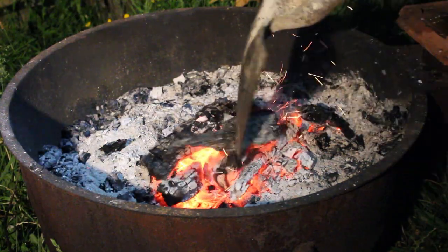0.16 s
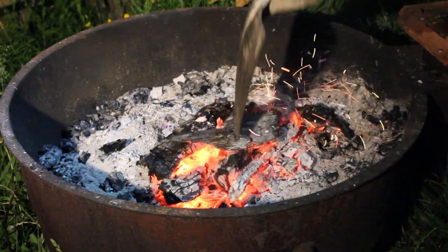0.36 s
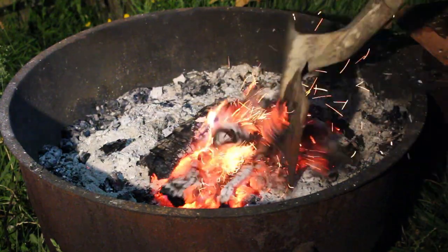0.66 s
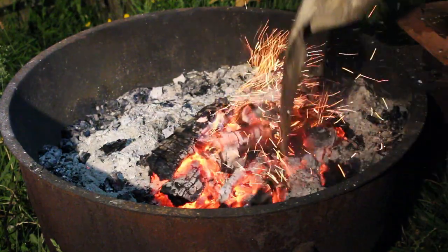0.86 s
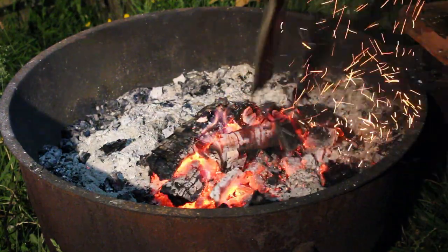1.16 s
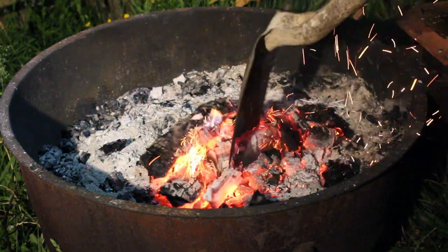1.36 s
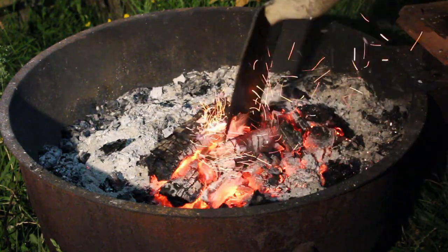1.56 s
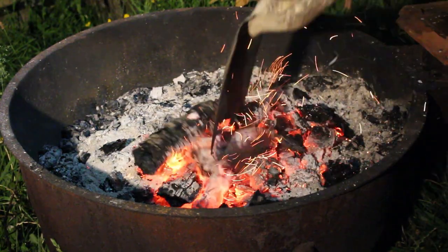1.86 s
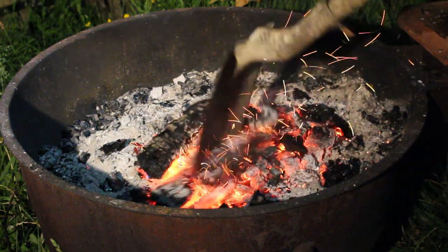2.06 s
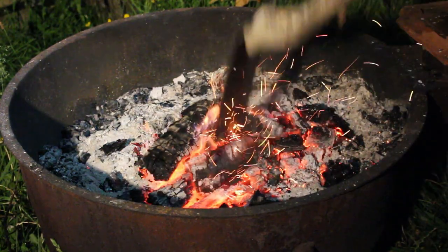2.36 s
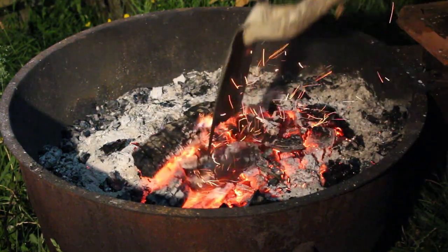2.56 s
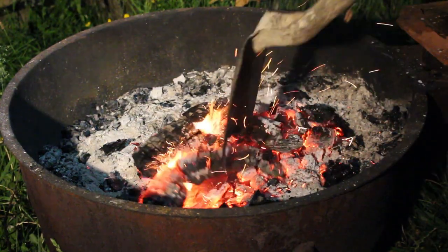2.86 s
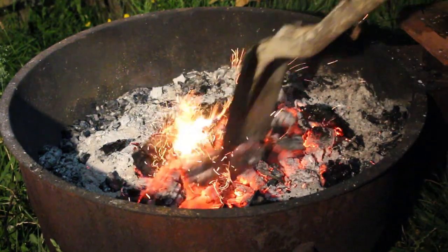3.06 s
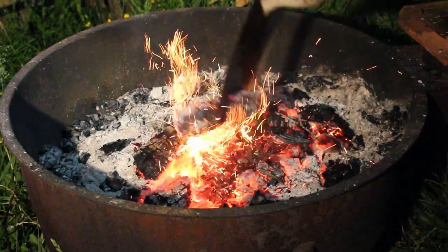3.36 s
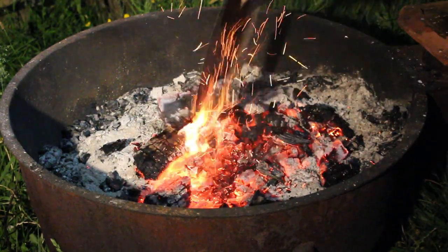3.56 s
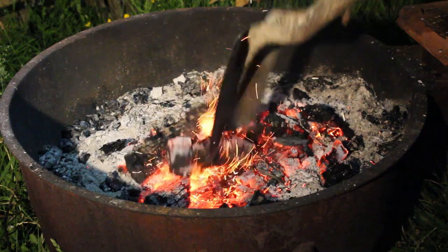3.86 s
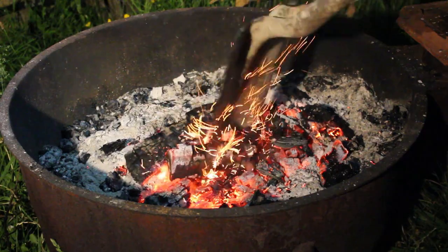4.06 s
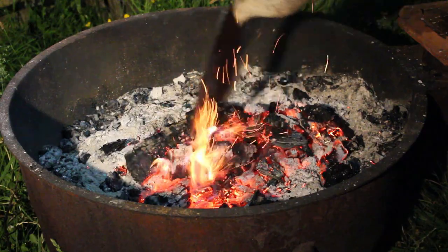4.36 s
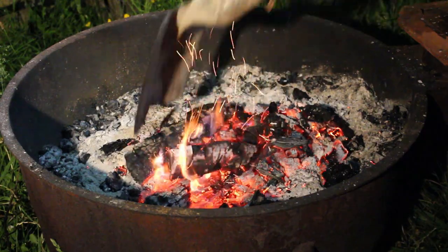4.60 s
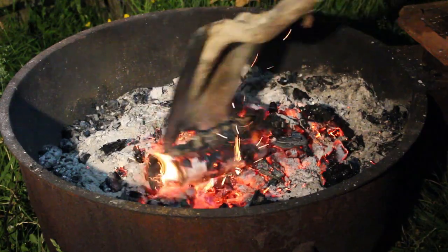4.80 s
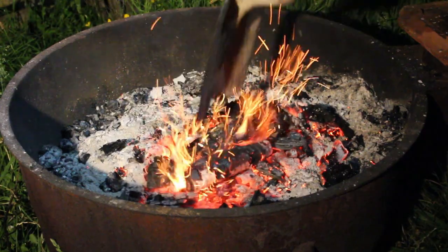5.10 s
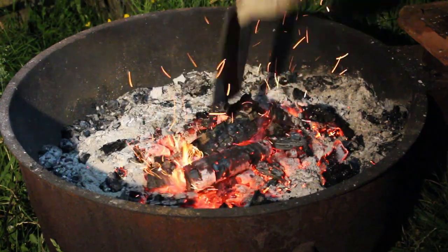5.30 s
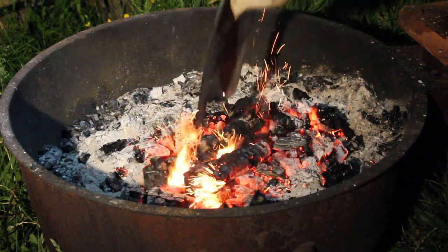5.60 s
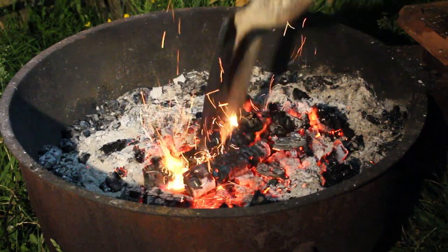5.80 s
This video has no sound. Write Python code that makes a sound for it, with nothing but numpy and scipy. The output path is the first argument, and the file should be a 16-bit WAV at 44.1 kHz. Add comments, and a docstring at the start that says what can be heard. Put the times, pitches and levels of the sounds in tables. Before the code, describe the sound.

Close up outdoors, a flat steel poker is thrust into glowing charcoal in a steel bowl. Sharp crunches land at about 0.1 and 0.6 seconds, the second followed by a fuller clatter of loosened embers. A busier run comes at 1.3, 1.7, 2.0, 2.4, 2.75 and 3.0, with hollow knocks and several low, soft thumps as the ash bed yields. Then it is mostly quiet, with tiny drops and trickles, until a bright hit at 3.8. A longer, grinding crunch with several snaps follows at 4.7, a small slide of embers near 4.9, and final sharp jabs at 5.4 and 5.7. Each stroke is very short: dense brittle cracking, a damped steel clink around the upper midrange, and a faint bowl ring. Glassy chips trickle afterwards. Underneath lies a faint hiss with a weak, fading sizzle; all action is centred, the microphone hiss slightly wide.

```python
"""A flat steel poker is driven twelve times into glowing charcoal in a steel fire bowl, outdoors, close by.
Each thrust is a dense run of brittle fractures that ring the blade, with a hollow knock and a bowl ring.
Most thrusts also thump the ash bed in slow sagging swings. Lumps snap in short bursts of fractures,
loose embers trickle back with glassy clinks or drop dully into the ash, and the fire hisses faintly as
filtered noise. The microphone stands straight ahead of the bowl and adds its own hiss left and right."""
import sys
import numpy as np
from scipy import signal
from scipy.fft import rfft, irfft
from scipy.io import wavfile

SR = 44100
rng = np.random.default_rng(int(sys.argv[2]) if len(sys.argv) > 2 else 0)


def pcm_store(signal):
    """Save signal as 16-bit PCM."""
    levels = np.round(np.clip(np.atleast_2d(signal), -1, 1) * 32767)
    wavfile.write(sys.argv[1], SR, levels.astype(np.int16).T)


N = 261954
TIME = np.arange(N) / SR
TOP_HZ = 15900  # upper edge of what the recorder keeps

# Thrusts of the poker. Each row: start in seconds, push length in seconds, level at entry in dB,
# level at the end of the push in dB, release time constant in seconds, blade ring in relative dB,
# centre of the blade ring in Hz, grit above 5 kHz in relative dB, hollow knock in relative dB, its pitch in Hz,
# bowl ring in dB, centre of the bowl ring in Hz, trickle of loosened embers in dB,
# their dull tumbling in dB, settling time constant in seconds.
THRUSTS = [ (.129, .013, -17, -16, 0.013, 0.5, 3240, -3, -6.5, 380, -53, 1430, -36, -52, 0.13),
           (.603, 0.017, -16.5, -17, 0.023, -4.5, 2560, -1.5, -13, 220, -39.5, 770, -24.5, -33.5, 0.089),
           (1.302, 0.052, -25.5, -23.5, 0.015, -1.5, 2650, -2, -3, 450, -43.5, 1430, -34.5, -46, 0.073),
           (1.719, .011, -24.5, -15.5, 0.014, 0, 3010, 0, 2, 348, -56.5, 1430, -32, -44.5, .09),
           (2.022, .051, -20, -21.5, 0.011, 1.5, 2750, -3, -3, 333, -43.5, 1360, -29, -33.5, 0.069),
           (2.433, 0.031, -21, -19.5, 0.013, -2, 2780, -4.5, -7.5, 310, -54, 1360, -36, -41.5, 0.12),
           (2.753, 0.016, -17.5, -16.5, 0.0091, -2, 2700, -4, 0.5, 363, -48, 1290, -34.5, -47, 0.091),
           (2.998, 0.022, -23, -16.5, 0.012, -19, 2720, -4.5, -5.5, 280, -52.5, 1290, -30.5, -36.5, 0.11),
           (3.822, 0.037, -22.5, -19, .011, 3, 2720, -6, -12, 401, -48, 1290, -40.5, -47.5, 0.09),
           (4.702, 0.059, -22, -25.5, 0.012, -1, 2920, -1.5, -17, 450, -45, 1430, -27.5, -38, 0.12),
           (5.392, 0.03, -18, -19, 0.0088, -2, 3100, 0.5, -8.5, 396, -53.5, 1290, -36.5, -51, 0.081),
           (5.723, 0.026, -25, -14.5, 0.0095, -7.5, 3600, -5, -12, 420, -50.5, 1290, -37, -45, 0.078)]
# Spectrum of breaking charcoal. Each row: frequency in Hz, relative level in dB.
CHARCOAL = [(100, 4), (400, -3.5), (750, 0.5), (1300, 1), (2000, 3.5), (3000, 5.5), (4500, -1), (8000, 1.5),
            (12500, -2.5), (16000, -10.5)]
# Spectrum of lumps tumbling in the ash. Each row: frequency in Hz, relative level in dB.
ASH = [(25, -34.5), (60, 4.5), (110, 2.5), (190, -1), (260, -5), (390, -2.5), (520, -8), (700, -13),
       (1500, -24.5), (6000, -39.5)]


def undb(db):
    """Decibels to gain."""
    return 10 ** (np.asarray(db) / 20)


def unit(x):
    """Scale to rms 1."""
    return x / (np.std(x) + 1e-12)


def add(track, s, x):
    """Mix x into the track from time s in seconds."""
    i = max(int(s * SR), 0)
    track[i:i + len(x)] += x[:len(track) - i]


def colour(x, points):
    """Causal minimum-phase filter through (Hz, dB) points, built from the folded cepstrum; rms 1."""
    size = 4096
    hz, db = np.transpose(points)
    bins_hz = np.arange(size // 2 + 1) * SR / size
    log_gain = np.log(undb(np.interp(np.log(bins_hz + 1), np.log(hz), db)))
    cepstrum = irfft(log_gain)[:size // 2]
    cepstrum[1:] *= 2
    response = irfft(np.exp(rfft(cepstrum, size)))
    return unit(signal.fftconvolve(x, response)[:len(x)])


def band(x, hz, q):
    """One broad resonance; rms 1."""
    b, a = signal.iirpeak(min(hz, SR / 3), max(q, 1), fs=SR)
    return unit(signal.lfilter(b, a, x))


def ring(modes, t):
    """Response of (Hz, dB, t60) modes to one tap: decaying sines of alternating sign."""
    total = 0
    for k, (hz, db, t60) in enumerate(modes):
        total = total + (-1) ** k * undb(db - 60 * t / t60) * np.sin(2 * np.pi * hz * t)
    return total


def focused(modes, centre_hz, focus_db, focus_width):
    """The point of contact favours the modes near one pitch; the width is in natural-log frequency."""
    favoured = []
    for hz, db, t60 in modes:
        closeness = np.exp(-(np.log(hz / centre_hz) / focus_width) ** 2)
        favoured.append((hz, db + focus_db * closeness, t60))
    return favoured


def fractures(n, per_s, spread_db):
    """Brittle cracking as random tiny clicks of uneven size and either sign; rms 1."""
    happens = rng.random(n) < per_s / SR
    size = undb(spread_db * np.clip(rng.standard_normal(n), -2, 2))
    return unit(happens * size * rng.choice([-1, 1], n))


def clinks(n, per_s, low_hz, high_hz, cycles, spread_db):
    """Small glassy chips, each with four unrelated partials that decay over so many cycles; rms 1."""
    out, t = np.zeros(n + 1024), TIME[:1024]
    for when, size, damping, *pitches in rng.random((int(per_s * n / SR) + 1, 7)):
        hz = np.minimum(low_hz + (high_hz - low_hz) * np.array(pitches)[:, None], TOP_HZ)
        decay = np.exp(-t * hz / (cycles * (.5 + damping)))
        partials = np.sin(2 * np.pi * hz * t) * decay
        add(out, when * n / SR, undb(spread_db * size) * partials.sum(axis=0))
    return unit(out[:n])


def bowl_echoes(x, share_db=-2, decay_s=0.0041):
    """Sound bounces between the bowl's close walls, in a new random pattern at every call; rms 1."""
    t = TIME[:SR // 60]
    taps = rng.standard_normal(len(t)) * np.exp(-t / decay_s)
    taps *= undb(share_db) / np.linalg.norm(taps)
    taps[0] = 1  # direct sound
    return unit(signal.fftconvolve(x, taps)[:len(x)])


def thrusts():
    """Charcoal crumbles while the blade pushes in; the hollow knock builds with depth and the bowl rings on."""
    # Modes of the steel bowl. Each row: frequency in Hz, relative level in dB, t60 in seconds.
    bowl_modes = [(770, -17, 1.6), (1014, -4, .7), (1165, -10, .5), (1290, -1, .6), (1312, -8, .6),
                  (1433, -5, .9), (1725, -7, .5), (2565, -2, .4), (2760, 0, .2)]
    # Spectrum of lumps knocking hollowly, pressed together. Each row: frequency in Hz, relative level in dB.
    knock_spectrum = [(60, -14.5), (150, 6.5), (250, -2.5), (380, -1.5), (540, 0), (800, -4), (1100, -1),
                      (2000, -17.5), (6000, -36)]
    out, t = np.zeros(N), TIME[:SR // 5]
    for (s, push, entry_db, end_db, release, blade_db, blade_hz, grit_db,
         knock_db, knock_hz, bowl_db, bowl_hz, *_) in THRUSTS:
        depth = np.minimum(t / push, 1)
        onset = np.minimum(t / 0.0025, 1)
        let_go = np.exp(-np.maximum(t - push, 0) / release)
        force = onset * undb(entry_db + (end_db - entry_db) * depth) * let_go

        cracks = fractures(len(t), per_s=5000, spread_db=5.5)
        gritty = [(hz, db + grit_db * (hz > 5000)) for hz, db in CHARCOAL]
        coal = colour(bowl_echoes(cracks), gritty)
        chips = clinks(len(t), per_s=500, low_hz=3462, high_hz=13750, cycles=36, spread_db=16)
        chips *= undb(grit_db - 6.0)
        steel = undb(blade_db) * blade(cracks, blade_hz)
        knock = colour(band(cracks, knock_hz, q=1.75), knock_spectrum)
        knock *= undb(knock_db - 6.7 * (1.5 - depth))
        add(out, s, force * (coal + chips + steel + knock))

        bowl_ring = ring(focused(bowl_modes, bowl_hz, focus_db=5, focus_width=0.075), TIME[:2 * SR])
        add(out, s + push, undb(bowl_db) * bowl_ring)
    return out


def blade(force, centre_hz, focus_db=5):
    """The poker rings; where it touches the coals decides which modes speak most; rms 1."""
    # Modes of the blade, damped by the coals. Each row: frequency in Hz, relative level in dB, t60 in seconds.
    blade_modes = [(1294, -7.5, 0.14), (1360, -16.5, 0.013), (1902, -11, 0.038), (2300, -28, .02),
                   (2577, 2, 0.046), (2742, 2.5, 0.045), (2880, 3, 0.021), (3034, 3, 0.041),
                   (3315, 1, 0.028), (3450, 3, 0.04), (3700, -9, 0.03), (5240, -17.5, 0.035),
                   (6100, -26, .03), (6540, -14, .025)]
    modes = focused(blade_modes, centre_hz, focus_db, focus_width=0.14)
    return unit(signal.fftconvolve(force, ring(modes, TIME[:SR // 10]))[:len(force)])


def thumps(sag_s=0.0084):
    """The bed of ash takes the weight in a few slow swings that sag in pitch as it yields."""
    # The ash bed gives way. Each row: start in seconds, final pitch in Hz, peak level in dB,
    # swell time in seconds, extra pitch at first contact in Hz.
    ash_thumps = [(0.129, 89, -26, 0.012, 58), (0.603, 105.5, -19, 0.011, 23),
                  (1.338, 92, -26, 0.0095, 190), (1.723, 100, -12.5, 0.0057, 30),
                  (2.028, 89.7, -15.5, 0.0096, 15), (2.458, 98, -16, 0.0071, 81),
                  (2.756, 97.4, -21.5, 0.01, 120), (3.012, 89.5, -13.5, 0.0062, 19),
                  (3.842, 84.7, -31, 0.01, 45), (5.404, 97, -21, 0.0085, 40),
                  (5.741, 95.5, -24.5, 0.0097, 40)]
    out, t = np.zeros(N), TIME[:SR // 5]
    for s, hz, db, swell, extra_hz in ash_thumps:
        pitch_hz = hz + extra_hz * np.exp(-t / sag_s)
        phase = 2 * np.pi * np.cumsum(pitch_hz) / SR
        envelope = t / swell * np.exp(1 - t / swell)
        add(out, s, undb(db) * envelope * np.sin(phase))
    return out


def snaps(crumble_db=-8, crumble_per_db=.4, large_db=-20):
    """A lump splits in a burst of fractures; large lumps crumble broadly, small ones clink at their own pitch."""
    # Single lumps snap. Each row: start in seconds, level in dB, pitch in Hz, decay time constant in seconds.
    lump_snaps = [(.095, -32, 12000, .0017), (0.1374, -11, 3300, .0016), (.207, -24.5, 2600, .006),
                  (.715, -18.5, 2600, .0063), (0.818, -21.5, 3000, .0015), (.885, -26, 2950, 0.0039),
                  (1.195, -32.5, 3300, .006), (1.436, -15.5, 3100, .0072), (1.589, -25, 4300, .0014),
                  (1.638, -35, 5000, .0022), (1.713, -18, 3000, .0071), (1.7676, -12.5, 3000, .0064),
                  (2.057, -4, 3000, .0016), (2.324, -27, 3500, .002), (2.4507, -5, 2900, .0024),
                  (2.8264, -14, 3000, .0075), (3.012, -7, 2700, .0015), (3.116, -21, 3000, .006),
                  (3.205, -23.5, 3000, .0033), (3.222, -23, 3200, .0032), (3.713, -40, 9000, .002),
                  (3.722, -37.5, 12000, .002), (3.808, -24, 3000, .016), (3.842, -4, 2900, .00074),
                  (3.852, -16, 2950, .0031), (4.108, -44, 5000, .002), (4.332, -43, 10000, .002),
                  (4.437, -35.5, 12000, .0023), (4.733, -13.5, 2800, .0067), (4.755, -9.5, 2900, .0023),
                  (4.825, -16, 3000, .0033), (4.991, -28, 2600, .008), (5.03, -27.5, 8500, .0031),
                  (5.4118, -3, 3000, .002), (5.543, -28, 7700, .0041), (5.645, -34.5, 3200, .0035),
                  (5.911, -21.5, 8000, .0028)]
    out, t = np.zeros(N), TIME[:SR // 12]
    for s, db, hz, decay in lump_snaps:
        cracks = fractures(len(t), per_s=14000, spread_db=2)
        # below large_db the broad part shrinks faster than the clink
        broad_db = crumble_db + crumble_per_db * min(db - large_db, 0)
        crumble = undb(broad_db) * colour(bowl_echoes(cracks), CHARCOAL)
        clink = undb(-9) * band(cracks, hz, q=6)
        add(out, s, undb(db) * np.exp(-t / decay) * (clink + crumble))
    return out


def settling():
    """Loose embers trickle, clink, scrape along the blade and tumble in the ash."""
    trickle, tumble = ember_motion()
    cracks = fractures(N, per_s=2500, spread_db=4) * avalanches(per_s=55, decay_s=.003, depth=1.5)
    scattered = bowl_echoes(cracks, share_db=-7)
    dust = undb(-3.5) * colour(scattered, CHARCOAL)
    dust += undb(-10) * band(bowl_echoes(cracks), 3020, q=4.5)
    chips = undb(-9) * clinks(N, per_s=400, low_hz=3500, high_hz=14500, cycles=18, spread_db=24)
    # larger lumps and the blade join in more as more coal moves
    contact = np.clip(trickle / undb(-37.5), 0, 1) ** 0.77
    scrape = undb(-5.0) * blade(cracks, centre_hz=2950, focus_db=1.5)
    lumps = undb(-6.5) * clinks(N, per_s=110, low_hz=1600, high_hz=4200, cycles=18, spread_db=15)
    thuds = undb(-1.5) * colour(fractures(N, per_s=350, spread_db=3.5), ASH)
    return trickle * (dust + chips + contact * (scrape + lumps)) + tumble * thuds


def ember_motion():
    """Trickle and tumbling gains: embers loosened by thrusts rest exponentially; slides swell and fade."""
    # A patch of embers slips or is nudged by the poker. Each row: time of its height in seconds,
    # half length in seconds, trickle in dB, dull tumbling in dB.
    ember_slides = [(.005, .015, -48, -60), (.238, 0.017, -33, -59), (0.862, 0.045, -41, -46),
                    (0.966, 0.045, -50.5, -53), (1.223, 0.066, -51.5, -63), (1.48, 0.028, -41, -49),
                    (1.63, 0.034, -47, -65), (1.97, 0.057, -51.5, -54.5), (2.218, 0.015, -45.5, -49),
                    (2.988, 0.026, -44, -36), (3.407, 0.026, -51, -52.5), (3.974, 0.015, -42.5, -46.5),
                    (4.362, .016, -53.5, -60.5), (4.896, 0.025, -30.5, -40), (5.1, .025, -54, -60),
                    (5.802, 0.012, -40.5, -55)]
    loosen_s = 0.021  # time for the embers to get moving once the push ends
    power = np.zeros((2, N))
    for s, push, *_, trickle_db, tumble_db, settle_s in THRUSTS:
        since = np.maximum(TIME - s - push, 0)
        moving = np.minimum(since / loosen_s, 1) * np.exp(-since / settle_s)
        power += np.outer(undb([trickle_db, tumble_db]), moving) ** 2
    for s, half_length, trickle_db, tumble_db in ember_slides:
        moving = np.exp(-.5 * ((TIME - s) / half_length) ** 2)
        power += np.outer(undb([trickle_db, tumble_db]), moving) ** 2
    return np.sqrt(power)


def avalanches(per_s, decay_s, depth):
    """Random short spurts of activity, as when one falling piece knocks others loose; mean 1."""
    starts = 1. * (rng.random(N) < per_s / SR)
    spurts = signal.lfilter([1], [1, -np.exp(-1 / (decay_s * SR))], starts)
    activity = 1 + depth * spurts
    return activity / activity.mean()


def drops():
    """A lump lands in ash with a short dull knock: a decaying burst of noise in the colour of ash."""
    # Lumps drop softly into the ash. Each row: start in seconds, peak level in dB.
    lump_drops = [(.368, -40.5), (1.516, -39.5), (1.924, -36), (2.618, -36), (3.425, -35.5), (3.626, -44),
                  (3.683, -45), (3.753, -42), (4.108, -45), (5.025, -44), (5.555, -42), (5.828, -37.5),
                  (5.908, -42)]
    out, t = np.zeros(N), TIME[:SR // 10]
    for s, db in lump_drops:
        knock = colour(rng.standard_normal(len(t)) * np.exp(-t / 0.0083), ASH)
        add(out, s, undb(db) * knock / np.abs(knock).max())
    return out


def fire():
    """A faint hiss of embers and open air, with tiny ticks of cooling coal and a narrow sizzle of hot wood."""
    # Spectrum of the quiet fire. Each row: frequency in Hz, relative level in dB.
    fire_spectrum = [(15, -41), (25, -6.5), (64, 5), (285, -4), (344, -2), (384, -6), (607, -10),
                     (887, -9.5), (962, -13), (1840, -13), (3160, -11.5), (4370, -16.5), (12500, -18.5),
                     (16000, -21)]
    # The sizzle over time, mostly dying away. Each row: time in seconds, level in dB.
    sizzle_levels = [(0, -58.5), (1.3, -61.5), (2.6, -69), (4, -75.5), (5.94, -72)]
    hiss = undb(-58) * colour(rng.standard_normal(N), fire_spectrum)
    ticks = undb(-70) * clinks(N, per_s=18, low_hz=2500, high_hz=13000, cycles=5, spread_db=18)
    s, sizzle_db = np.transpose(sizzle_levels)
    sizzle = undb(np.interp(TIME, s, sizzle_db)) * band(rng.standard_normal(N), hz=3200, q=4)
    return hiss + ticks + sizzle


def microphone_hiss():
    """Self-noise of the microphone: independent coloured noise for the left and right channels."""
    # Spectrum of the self-noise. Each row: frequency in Hz, relative level in dB.
    hiss_spectrum = [(30, 2), (150, 4), (1000, 0), (4000, -2), (16000, 0.7)]
    return np.array([undb(-62) * colour(noise, hiss_spectrum) for noise in rng.standard_normal((2, N))])


def scene():
    """All sound comes from the bowl straight ahead; only the microphone's hiss differs left and right."""
    bowl = thrusts() + thumps() + snaps() + settling() + drops() + fire()
    return bowl + microphone_hiss()


def record(dry, low_cut_hz=30):
    """The recorder thins the deepest bass, clips at full scale and cuts the top."""
    bass_cut = signal.butter(2, low_cut_hz, "high", fs=SR, output="sos")
    top_cut = signal.ellip(10, .2, 80, TOP_HZ, fs=SR, output="sos")  # 0.2 dB ripple, 80 dB down
    thinned = signal.sosfilt(bass_cut, dry)
    return signal.sosfilt(top_cut, np.clip(thinned, -1, 1))


dry = scene()
out = record(dry)
pcm_store(out)
```